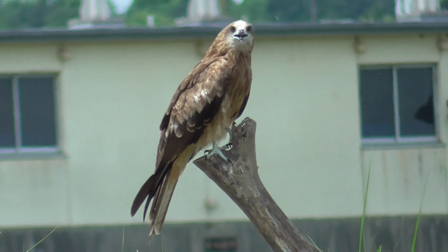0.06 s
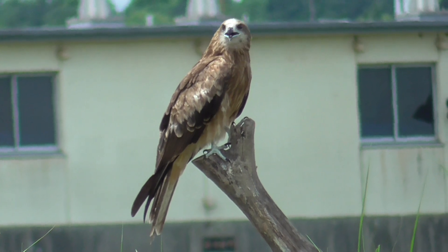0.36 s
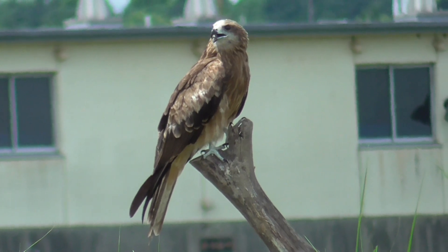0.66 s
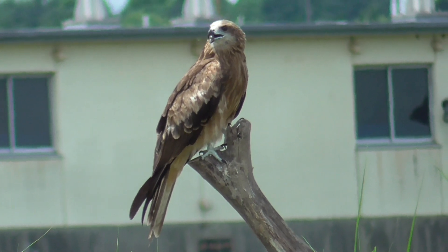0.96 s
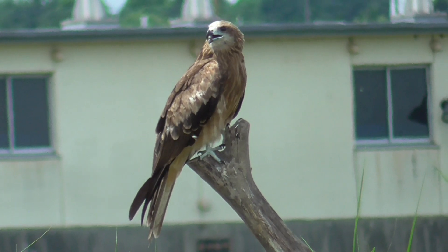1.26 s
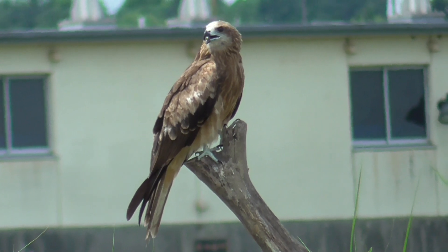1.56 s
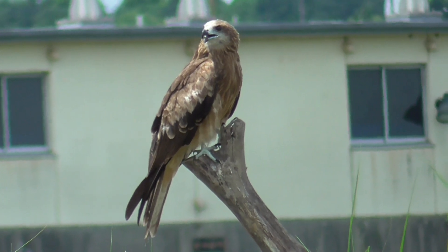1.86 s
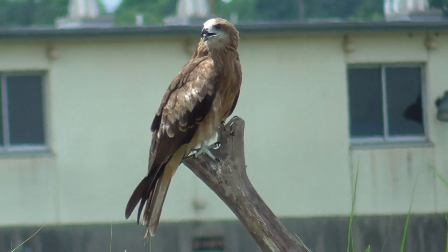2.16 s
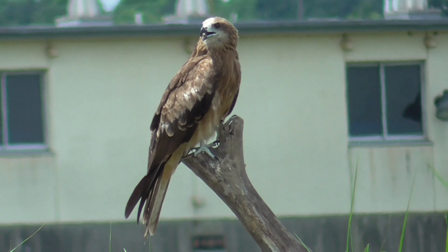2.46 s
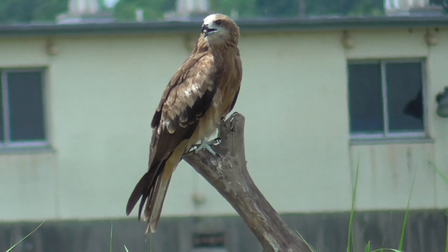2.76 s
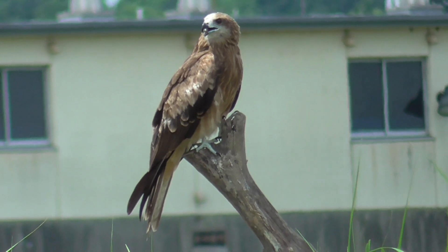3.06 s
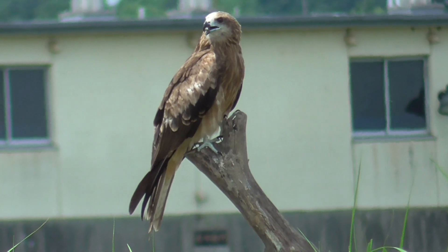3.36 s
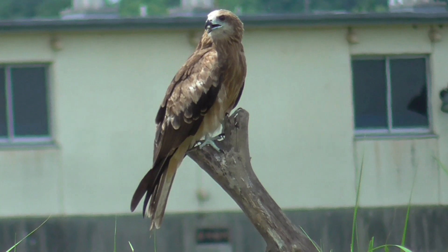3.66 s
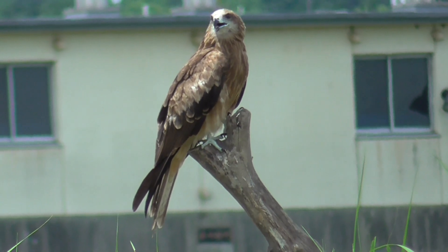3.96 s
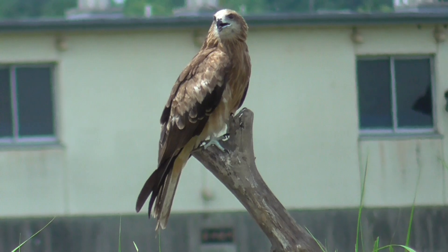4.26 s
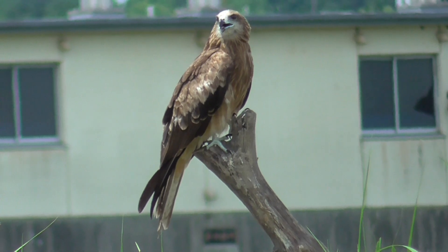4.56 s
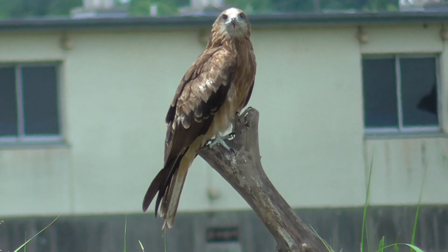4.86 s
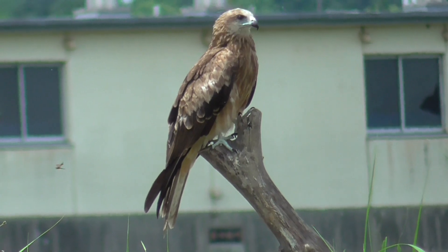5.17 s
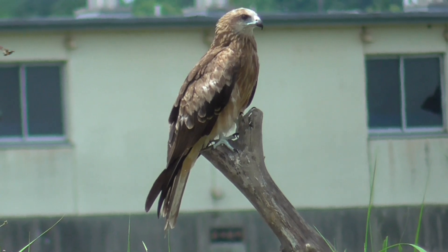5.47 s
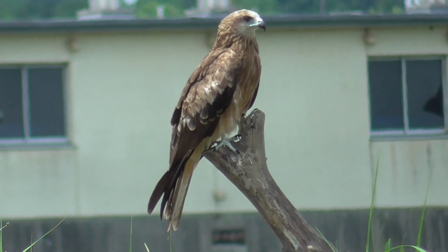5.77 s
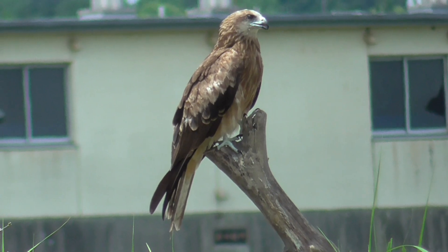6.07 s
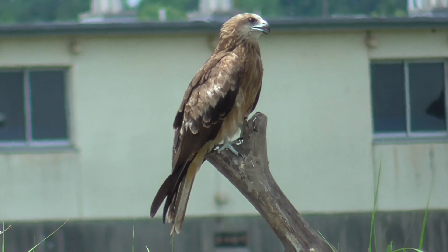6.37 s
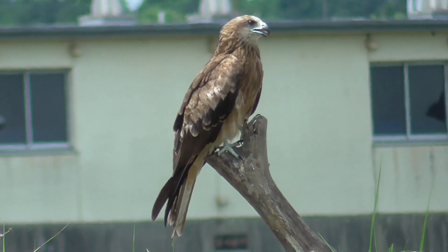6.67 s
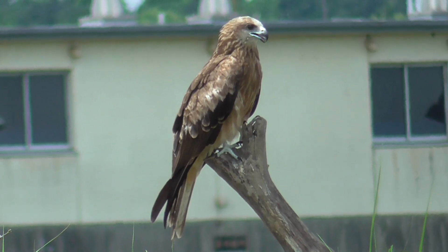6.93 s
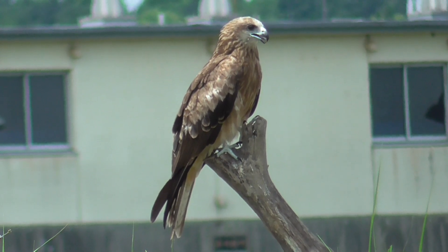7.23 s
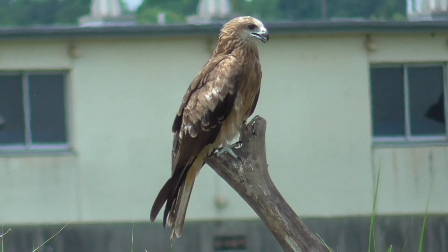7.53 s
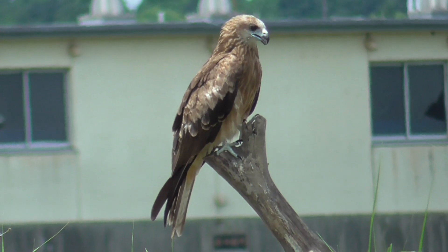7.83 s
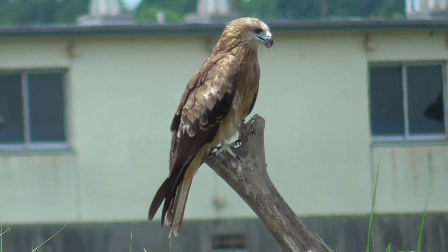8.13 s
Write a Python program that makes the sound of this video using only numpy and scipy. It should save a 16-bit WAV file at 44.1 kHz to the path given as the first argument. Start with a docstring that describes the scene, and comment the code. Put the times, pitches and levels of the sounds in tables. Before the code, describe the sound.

A quiet outdoor yard with a continuous low rumble of light wind and a faint hiss of leaves and insects. A bush cricket on the left trills very high and thin, about eight bursts a second, almost throughout. A small bird, also left, gives single short chirps at about 0.2, 1.3, 3.4, 4.6, 5.6, 6.9 and 8 seconds. A soft warble and falling whistles come around 1.4 to 1.8 seconds. Raspy double scolding notes follow from 2 to 3 seconds, then a quick run of chatter swells and fades between 3.5 and 4.2. Four falling churrs sound on the right until 5 seconds, with one clear downward whistle. Dry ticks and rising pips fill 5.4 to 6 seconds, followed by sparse, fainter calls. The wind swells briefly near 7.4 seconds. The birds sound a little distant, with a faint echo.

```python
"""A yard in front of a low building. Small birds chirp and whistle in gliding tones, and chatter
as pulses of the syrinx excite a resonance of the throat. A bush cricket trills in short bursts,
each stroke scraping a file that rings its wings, over the fizz of other insects in the grass.
Leaves, light wind and a distant rumble lie underneath; ground, walls and trees give a faint echo."""
import sys
import numpy as np
from scipy import signal
from scipy.fft import rfft, irfft
from scipy.io import wavfile
from scipy.ndimage import uniform_filter1d, map_coordinates

SR = 44100
rng = np.random.default_rng(int(sys.argv[2]) if len(sys.argv) > 2 else 0)


def transcribe(u):
    """Save the signal u as a 16-bit wav file named by the first command-line argument.

    u: samples, shape (n,) or (channels, n), limited to [-1, 1]; the rate is SR.
    q: integer samples, one column per channel.
    """
    v = np.clip(np.atleast_2d(u).T, -1, 1)
    q = np.round(v * 32767).astype(np.int16)
    wavfile.write(sys.argv[1], SR, q)


N = 366030


def chirps(roughness=.4, waver=.05, hoarse_db=-9.5, hoarse_s=.081, side_db=7, lag_s=.00007):
    """Random amplitude and frequency modulation roughen the swept tone of one bird's repeated call."""
    # the calls (time [s], level [dB], pitch factor [ratio])
    calls = [(.243, -58, 1.01), (1.32, -59, 1.01), (3.385, -60, 0.98), (4.579, -58.5, 1), (5.645, -57, .99),
             (6.881, -56, 0.99), (8.046, -54.5, 1.01)]
    # a call's thin lead-in, arch and falling tail
    # (offset [s], length [s], start [Hz], middle [Hz], end [Hz], relative level [dB], swell [dB])
    parts = [(-.023, .02, 4900, 5000, 5150, -16, 4), (-.006, .028, 3150, 4560, 3100, -3.5, 5),
             (.023, .034, 3620, 3370, 3130, -3.5, -12)]
    out = np.zeros((2, N))
    for s, call_db, pitch in calls:
        for offset, length, first, middle, last, db, swell_db in parts:
            size = round(length * SR)
            hz = pitch * arc(first, middle, last, size) * (1 + waver * drift(size, 600))
            level = gain_of(call_db + db + swell_db * np.linspace(-.5, .5, size))
            level *= 1 + roughness * drift(size, 440)
            tone = level * sine(hz) * signal.windows.tukey(size, .42)
            add(out, s + offset, placed(tone, side_db, lag_s))
        # a weaker, hoarse second voice falls straight through the call
        fall_hz = np.linspace(5300, 3200, round(hoarse_s * SR))
        noise = rng.standard_normal(len(fall_hz))
        hoarse = unit_rms(resonate(resonate(noise, fall_hz, 500), fall_hz, 900))
        hoarse *= gain_of(call_db + hoarse_db) * np.hanning(len(fall_hz)) ** 2
        add(out, s - .024, placed(hoarse, side_db, lag_s))
    return out


def clear_notes(pip_s=.017, pip_hz=(3620, 4240, 4420)):
    """Pitch contours: three frequencies define each note of a warble, the slurs and the rising pips."""
    # a short warble and a high peep
    # (time [s], length [s], start [Hz], middle [Hz], end [Hz], level [dB])
    warble = [(1.358, .061, 2250, 2144, 2870, -66), (1.406, .022, 2700, 3330, 3850, -74),
              (1.413, .028, 2300, 2240, 2260, -69), (1.427, .036, 3800, 2880, 2450, -74),
              (3.195, .045, 6200, 6170, 6000, -69)]
    # falling slurs (time [s], length [s], start [Hz], level [dB])
    slurs = [(1.51, .029, 2700, -65), (1.673, .04, 2730, -65), (1.782, .03, 2450, -72),
             (2.458, 0.049, 5080, -63), (4.93, 0.07, 5150, -58.5)]
    # quick rising pips (time [s], level [dB])
    pips = [(5.421, -68), (5.874, -65.5), (5.921, -59), (5.99, -59)]
    notes = list(warble)
    for s, length, hz, db in slurs:
        notes.append((s - .022, .034, 1.02 * hz, .98 * hz, .92 * hz, db - 13))  # thin lead-in
        notes.append((s, length, hz, .8 * hz, .665 * hz, db))
    return notes + [(s, pip_s, *pip_hz, db) for s, db in pips]


def whistles(waver=.011):
    """Frequency modulation: each clear note is a nearly pure tone gliding along a smooth arc."""
    # where the whistles come from (time [s], left minus right [dB])
    sides = [(1.8, 8), (2.4, 1), (4.9, 3), (5.4, 0)]
    out = np.zeros((2, N))
    for s, length, first, middle, last, db in clear_notes():
        size = round(length * SR)
        hz = arc(first, middle, last, size) * (1 + waver * drift(size, 300))
        tone = gain_of(db) * sine(hz) * signal.windows.tukey(size, .8)
        add(out, s, placed(tone, at_time(sides, s), lag_s=.00002))
    return out


def scold_notes(length_s=.049, step_s=.054, rise=1.05):
    """Bandwidth sets harshness: a syllable with a narrow voiced core, then a higher, broader one."""
    # low scolds (time [s], pitch [Hz], bandwidth [Hz], level [dB], relative core level [dB])
    scolds = [(2.131, 2170, 650, -61, -3), (2.34, 2280, 650, -61, -4.5), (2.772, 2650, 900, -59.5, -7),
              (2.975, 2800, 1000, -59, -16)]
    notes = []
    for s, hz, width, db, core_db in scolds:
        second_hz = 1.08 * hz
        notes += [(s, length_s, hz, hz * rise, width, db - 2),
                  (s, length_s, hz, hz * rise, 280, db + core_db),
                  (s + step_s, length_s, second_hz, second_hz * rise, 1.15 * width, db)]
    return notes


def chatter_notes(beats=7, start_s=3.506, step_s=.1112, peak_s=3.8, peak_db=-55.5, fade_db_per_s=15.5):
    """Periodic beats swell and fade under one envelope, each with its own scatter of pitch and level."""
    # one beat: a low hiccup and a two-voiced rasp
    # (offset [s], length [s], start [Hz], end [Hz], bandwidth [Hz], relative level [dB])
    beat = [(-.032, .016, 1880, 2480, 700, -8.5), (0, .05, 3680, 3520, 900, -1.5),
            (.004, .042, 4850, 4750, 850, -8.5)]
    notes = []
    for s in start_s + step_s * np.arange(beats):
        effort_db = peak_db - fade_db_per_s * abs(s - peak_s)
        for offset, length, first, last, width, db in beat:
            pitch = 1 + .04 * rng.standard_normal()
            level_db = effort_db + db + 1.2 * rng.standard_normal()
            notes.append((s + offset, length, first * pitch, last * pitch, width, level_db))
    return notes


def harsh_notes():
    """Gliding bands: a centre frequency and a bandwidth define each of the birds' noisy notes."""
    # single harsh notes (time [s], length [s], start [Hz], end [Hz], bandwidth [Hz], level [dB])
    singles = [(1.778, .034, 2280, 2120, 450, -64.5), (1.814, .007, 4400, 4400, 2000, -60.5),
               (2.499, .046, 3870, 4120, 1190, -58.5), (3.103, .022, 3200, 3500, 800, -56),
               (3.138, 0.038, 4220, 4700, 1400, -60), (3.26, .013, 3900, 4100, 1400, -56.5),
               (3.445, .025, 4400, 4300, 1000, -64), (3.562, .036, 4200, 4200, 900, -64),
               (3.912, .025, 4300, 4270, 600, -58), (4.596, .036, 5340, 5260, 590, -68.5),
               (5.11, .042, 5300, 5500, 700, -72), (6.17, .04, 4640, 3900, 900, -71),
               (6.43, .055, 2100, 1800, 300, -74), (7.382, .045, 4150, 3970, 700, -64),
               (7.442, .032, 4600, 3400, 1300, -66)]
    # falling churrs (time [s], level [dB])
    churrs = [(4.276, -62.5), (4.449, -63), (4.811, -61.5), (4.982, -63)]
    # a far bird's faint, blurred notes (time [s], level [dB])
    far_notes = [(6.63, -75), (7.11, -71), (7.56, -72), (7.8, -73)]
    # dry ticks (time [s], level [dB])
    ticks = [(5.37, -68), (5.442, -64), (5.542, -65), (5.605, -61), (5.741, -62), (5.82, -62.5),
             (5.887, -64.5), (5.988, -66), (6.058, -64.5)]
    notes = list(singles) + scold_notes() + chatter_notes()
    notes += [(s, .052, 3380, 2560, 760, db) for s, db in churrs]
    notes += [(s, .11, 3950, 3750, 600, db) for s, db in far_notes]
    return notes + [(s, .019, 3260, 3174, 650, db) for s, db in ticks]


def rasps(pulse_hz=250.2, jitter=.15, noise_share=.35, swing=.206):
    """Source and filter: uneven pulses of the syrinx modulate a tone and ring the throat around it."""
    # where the chatter comes from (time [s], left minus right [dB])
    sides = [(2.2, 3), (3.0, 2.5), (3.15, -2), (4.15, -0.5), (4.3, -7), (5.0, -6), (5.4, -4)]
    out = np.zeros((2, N))
    for s, length, first, last, width, db in harsh_notes():
        size = round(length * SR)
        hz = np.linspace(first, last, size)
        cycles = np.cumsum(pulse_hz * (1 + jitter * drift(size, 200))) / SR
        pulses = np.diff(np.floor(cycles), prepend=-1)
        opening = .32 + np.exp(-(cycles % 1) / .36)
        breath = unit_rms(opening * rng.standard_normal(size))
        drive = (1 - noise_share) * unit_rms(pulses) + noise_share * breath
        throat = unit_rms(resonate(drive, hz, 1.8 * width))
        tone = unit_rms(opening * sine(hz + swing * width * drift(size, 540)))
        core = np.interp(first, [2900, 3600], [.6, 1.1])  # high notes are clearer, low ones mostly rasp
        # the beak passes only a band about the throat's pitch
        band_hz = np.clip([hz.mean() - 1.05 * width, hz.mean() + 1.2 * width], 500, SR / 2 - 500)
        beak = signal.butter(6, band_hz, "band", fs=SR, output="sos")
        note = unit_rms(signal.sosfilt(beak, core * tone + throat))
        # low notes swell; high notes start crisply and fade
        swell_db = np.interp(first, [2800, 3700], [3, -8]) * np.linspace(-.5, .5, size)
        note *= gain_of(db + swell_db) * signal.windows.tukey(size, .23)
        add(out, s, placed(note, at_time(sides, s), lag_s=.00013))
    return out


def trill_gate(t, burst_s=.071, ramp_s=.015):
    """On-off modulation: short ramps switch the cricket's song into bursts and longer holds."""
    # runs of even bursts (start [s], end [s], burst rate [Hz])
    runs = [(.585, 1.9, 8.13), (1.95, 2.55, 7.75), (2.612, 4.3, 8.3), (4.85, 5.48, 9.1), (5.595, 6.99, 8.4),
            (7.03, 8.25, 7.95)]
    # unbroken trills (start [s], end [s])
    holds = [(.02, .28), (.37, 0.51), (4.35, 4.75)]
    bursts = [(s, s + burst_s) for start, end, rate in runs for s in np.arange(start, end, 1 / rate)]
    return sum(np.clip(np.minimum(t - start, end - t) / ramp_s + .5, 0, 1)
               for start, end in list(holds) + bursts)


def cricket(stroke_hz=50.3, depth=.45, scattered_db=-11):
    """Stridulation: every fast stroke scrapes a file and excites the resonances of the wings."""
    # wing resonances (frequency [Hz], bandwidth [Hz], relative level [dB])
    wing_modes = [(7610, 73, 3.5), (7726, 82, 0), (7460, 120, -5), (7190, 150, -7)]
    # how hard the cricket sings (time [s], level [dB])
    effort = [(0, -68.5), (1.25, -67.5), (1.9, -73), (2.7, -69), (3.7, -69.5), (4.6, -70), (4.9, -72.5),
              (5.4, -69.5), (6.2, -66), (6.85, -67), (7.7, -71), (8.2, -70.5)]
    t = np.arange(N) / SR
    level = trill_gate(t) * gain_of(at_time(effort, t))
    phase = 2 * np.pi * np.cumsum(stroke_hz * (1 + .0382 * drift(N, 8.24))) / SR
    # each stroke starts sharply and trails off
    strokes = unit_rms(np.maximum(1 + depth * np.cos(phase) + .27 * np.cos(2 * phase + 1.2), 0))
    wings = np.array([ring(rng.standard_normal(N), wing_modes) for _ in range(2)])
    wings /= np.sqrt(uniform_filter1d(wings ** 2, size=1300) + 1e-9)  # strokes about equally strong
    song, scattered = level * strokes * wings
    direct = placed(song, side_db=6.3, lag_s=.00015)
    return direct + gain_of(scattered_db) * placed(scattered, side_db=-1.8, lag_s=0)


def meadow(leaves_db=-75, fizz_db=-70, chorus_left_db=-73.5, chorus_right_db=-76):
    """Incoherent summation: leaves, far birds and many insects merge into bands of noise."""
    # the other crickets' resonances (frequency [Hz], bandwidth [Hz], relative level [dB])
    chorus_modes = [(7360, 210, 5), (7510, 120, -3)]
    # leaves and far birds (frequency [Hz], relative spectral density [dB])
    leaf_spectrum = [(1000, -33), (1700, -3.5), (2200, -1.5), (2750, -6.5), (3650, -0.5), (4350, -4),
                     (5300, -7), (6000, -9.5), (6700, -8.5), (7300, -10), (9000, -40)]
    # insects in the grass (frequency [Hz], relative spectral density [dB])
    fizz_spectrum = [(5000, -46), (7400, 2.5), (7950, -3), (8400, -4), (9400, -1.5), (10600, -4),
                     (13200, -3.5), (14500, -7.5), (15800, -6)]
    chorus = np.array([ring(rng.standard_normal(N), chorus_modes) * gain_of(1.7 * drift(N, 3.3))
                       for _ in range(2)])
    leaves = gain_of(leaves_db) * diffuse_noise(leaf_spectrum, patchy_db=1.76)
    fizz = gain_of(fizz_db) * diffuse_noise(fizz_spectrum, patchy_db=1.1)
    return leaves + fizz + chorus * gain_of([[chorus_left_db], [chorus_right_db]])


def wind(split_hz=300, rush_db=-53, stir_db=.55):
    """Amplitude-modulated noise: the low rumble swells with the gusts; the rush above barely stirs."""
    # wind and distant rumble (frequency [Hz], relative spectral density [dB])
    spectrum = [(10, -43), (25, -27), (40, -20.5), (52, -6.5), (78, 0.5), (100, -1), (150, .5), (195, -1.5),
                (290, -13.5), (410, -17), (620, -22.5), (1050, -25.5), (1480, -35.5), (1760, -48),
                (2500, -54), (4200, -120)]
    # the gusts (time [s], level [dB])
    gusts = [(0.0, -44), (0.04, -40), (2.54, -43), (2.59, -41), (4.0, -44), (5.85, -42), (6.06, -46.5),
             (6.45, -39.5), (7.12, -42.5), (7.42, -35), (7.67, -44), (8.3, -41)]
    noise = diffuse_noise(spectrum, patchy_db=.68)
    low = signal.sosfiltfilt(signal.butter(4, split_hz, fs=SR, output="sos"), noise)
    rumble = unit_rms(low) * gain_of(at_time(gusts, np.arange(N) / SR))
    rush = unit_rms(noise - low) * gain_of(rush_db + stir_db * drift(N, .9))
    return rumble + rush


def yard(x, near_db, far_db, near_t60_s=.047, echoes_per_s=2500):
    """Reverberation: ground and wall scatter a quick cluster of echoes; trees add a faint longer tail."""
    # decay of the tail (frequency [Hz], reverberation time [s])
    tail_t60 = [(1000, 0.36), (4000, 0.48), (8000, 0.26)]
    t = np.arange(SR // 2) / SR
    taps = rng.choice([-1., 1.], (2, len(t)))
    taps *= (rng.random((2, len(t))) < echoes_per_s / SR) * (t > .004)
    near = taps * gain_of(-60 * t / near_t60_s)
    hz, frame_s, late = signal.stft(taps[::-1] * (t > .025), SR, nperseg=256)
    late *= gain_of(-60 * frame_s / at_frequency(tail_t60, hz)[:, None])
    far = signal.istft(late, SR, nperseg=256)[1][:, :len(t)]
    echo = gain_of(near_db) * near / np.linalg.norm(near[0])
    echo += gain_of(far_db) * far / np.linalg.norm(far[0])
    return x + signal.fftconvolve(x, echo, axes=1)[:, :N]


def diffuse_noise(spectrum, patchy_db):
    """A diffuse field: partly coherent stereo noise, of rms 1 in mono, whose level drifts in patches."""
    # likeness of left and right (frequency [Hz], coherence [ratio])
    coherence = [(60, 0.9), (150, 1), (380, 0.84), (950, 0.34), (2380, 0.42), (5980, 0.17), (15000, -0.01)]
    # how far the left leads (frequency [Hz], phase [rad])
    lead = [(100, 0.023), (300, 0.39), (800, 0.75), (2000, 0.68), (4000, 0)]
    # balance of the field (frequency [Hz], left minus right [dB])
    sides = [(200, 0), (500, -0.1), (1100, 2.5), (2500, 0.5), (4000, -0.5), (6000, -0.5), (8500, 4),
             (10000, -0.5), (15000, -0.5)]
    frames, hz = N // 512 + 5, np.fft.rfftfreq(2048, 1 / SR)
    a, b, c, d, patches = rng.standard_normal((5, frames, len(hz)))
    patches = unit_rms(uniform_filter1d(uniform_filter1d(patches, size=7, axis=0), size=24, axis=1))
    left, independent = a + 1j * b, c + 1j * d
    shared = np.clip(at_frequency(coherence, hz), -1, 1)
    right = shared * left + np.sqrt(1 - shared ** 2) * independent
    right *= np.exp(-1j * at_frequency(lead, hz))
    side = gain_of(at_frequency(sides, hz) / 2)
    level = gain_of(at_frequency(spectrum, hz) + patchy_db * patches)
    spectra = level * np.array([left * side, right / side])
    x = signal.istft(spectra, nperseg=2048, noverlap=1536, time_axis=1, freq_axis=2)[1][:, :N]
    return x / np.std(x.mean(0))


def resonate(x, hz, width):
    """A resonance of gain 1 whose centre follows hz."""
    carrier = np.exp(2j * np.pi * np.cumsum(hz * np.ones(len(x))) / SR)
    pole = np.exp(-np.pi * width / SR)
    return 2 * (carrier * signal.lfilter([1 - pole], [1, -pole], x / carrier + 1e-18)).real


def ring(x, modes):
    """Modal superposition: x drives a set of steep-sided resonances."""
    return unit_rms(sum(gain_of(db) * unit_rms(resonate(resonate(x, hz, width), hz, width))
                        for hz, width, db in modes))


def placed(x, side_db, lag_s):
    """Direction from level and delay: the left is side_db louder, the right lag_s later."""
    late = map_coordinates(x, [np.arange(len(x)) - lag_s * SR], order=3)
    return np.array([x * gain_of(side_db / 2), late * gain_of(-side_db / 2)])


def drift(size, hz):
    """Low-pass noise of rms about 1 that changes about hz times a second."""
    f = np.fft.rfftfreq(SR + size, 1 / SR)
    spectrum = rfft(rng.standard_normal(SR + size)) * np.exp(-(f / hz) ** 2)
    return unit_rms(irfft(spectrum))[:size]


def sine(hz):
    """A tone of rms 1 whose phase is the integral of its frequency."""
    return np.sqrt(2) * np.sin(2 * np.pi * np.cumsum(hz) / SR)


def arc(first, middle, last, size):
    """A parabola through three pitches."""
    return np.polyval(np.polyfit([0, .5, 1], [first, middle, last], 2), np.linspace(0, 1, size))


def add(mix, s, sound):
    """Superposes a stereo sound at time s."""
    part = mix[:, max(round(s * SR), 0):][:, :sound.shape[1]]
    part += sound[:, :part.shape[1]]


def at_time(points, s):
    """Interpolates a table in time."""
    return np.interp(s, *np.transpose(points))


def at_frequency(points, hz):
    """Interpolates a table on a log-frequency axis."""
    f, value = np.transpose(points)
    return np.interp(np.log(hz + 1), np.log(f + 1), value)


def gain_of(db):
    """Decibels as an amplitude ratio."""
    return 10 ** (np.asarray(db) / 20)


def unit_rms(x):
    """Scales to rms 1."""
    return x / np.sqrt(np.mean(x ** 2) + 1e-20)


def scene():
    """Superposition: the birds echo in the yard; insects and wind surround them."""
    birds = yard(chirps(), near_db=-6.5, far_db=-15)
    birds += yard(whistles(), near_db=-12, far_db=-17)
    birds += yard(rasps(), near_db=-9, far_db=-14)
    return birds + cricket() + meadow() + wind()


def record(dry, low_cut_hz=40, high_cut_hz=15780):
    """Band limiting: filters remove the deepest rumble and the highest treble."""
    high_pass = signal.butter(4, low_cut_hz, "high", fs=SR, output="sos")
    low_pass = signal.firwin(1023, high_cut_hz, window=("kaiser", 9), fs=SR)
    return signal.oaconvolve(signal.sosfilt(high_pass, dry), low_pass[None], "same")


dry = scene()
out = record(dry)
transcribe(out)
```